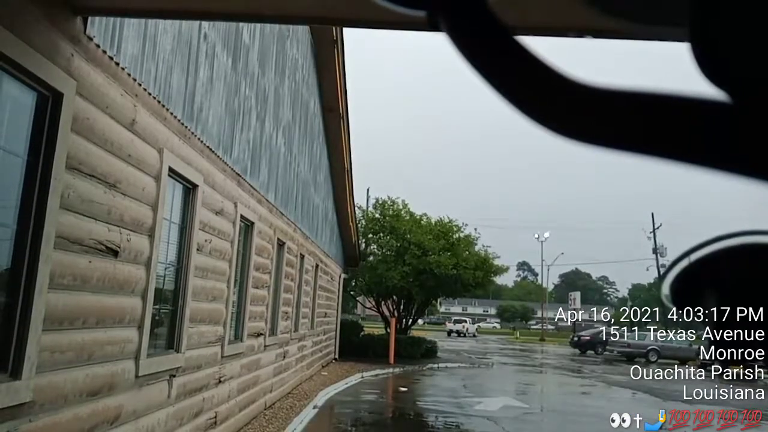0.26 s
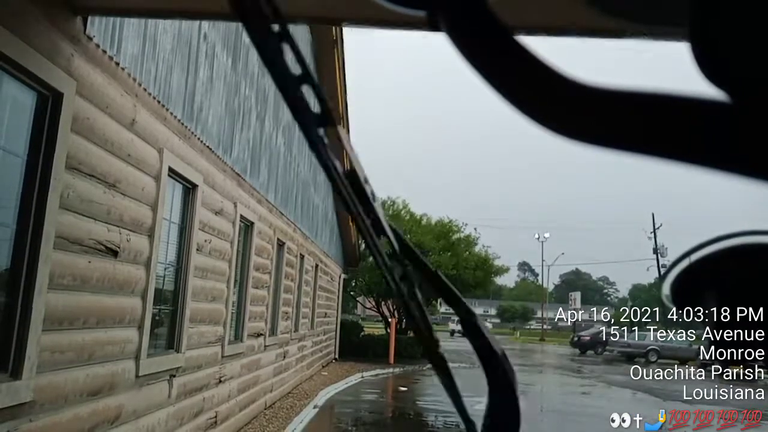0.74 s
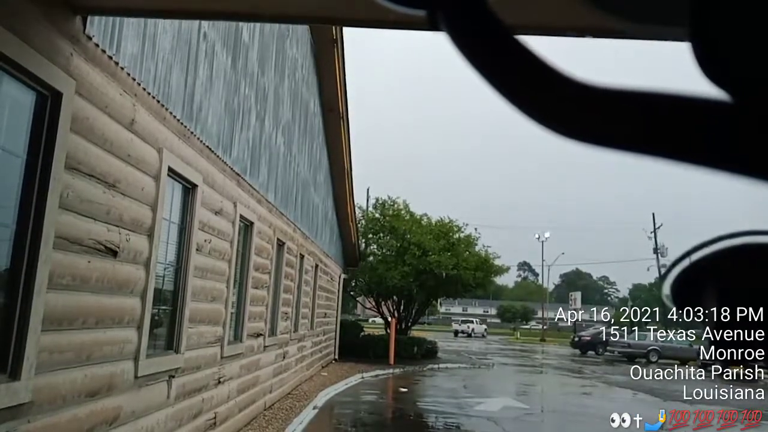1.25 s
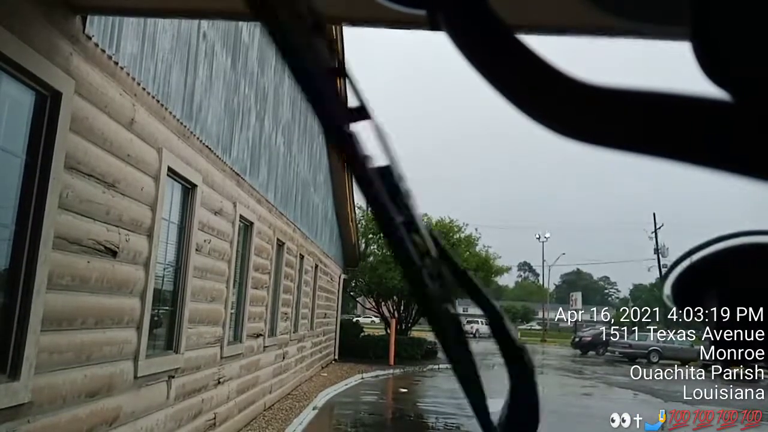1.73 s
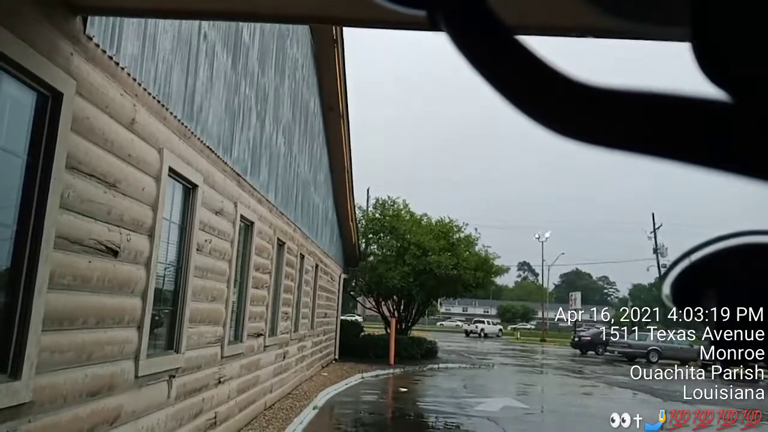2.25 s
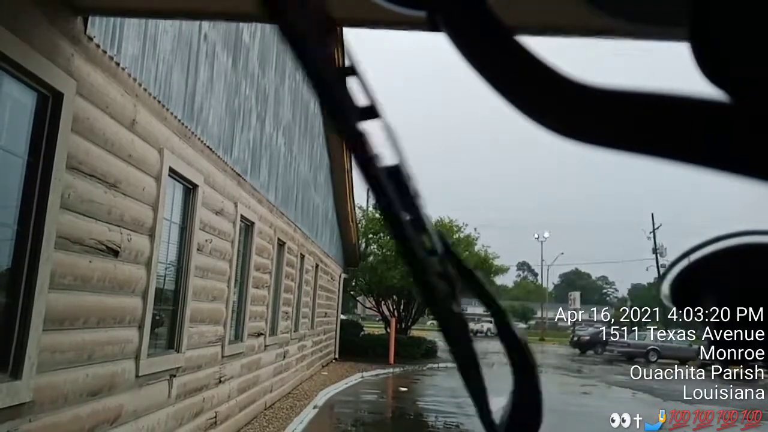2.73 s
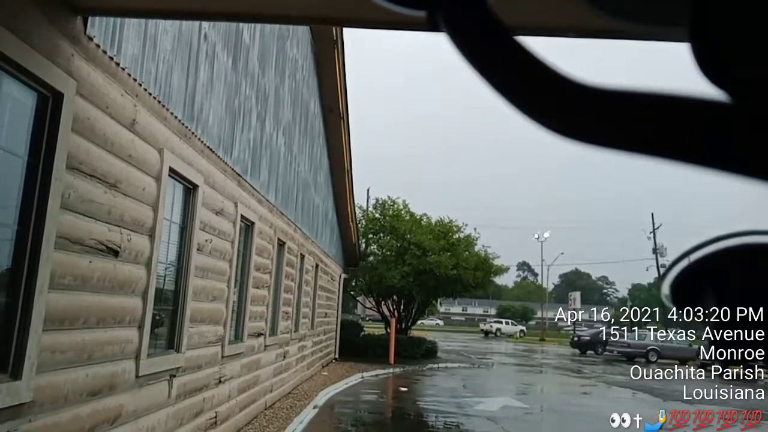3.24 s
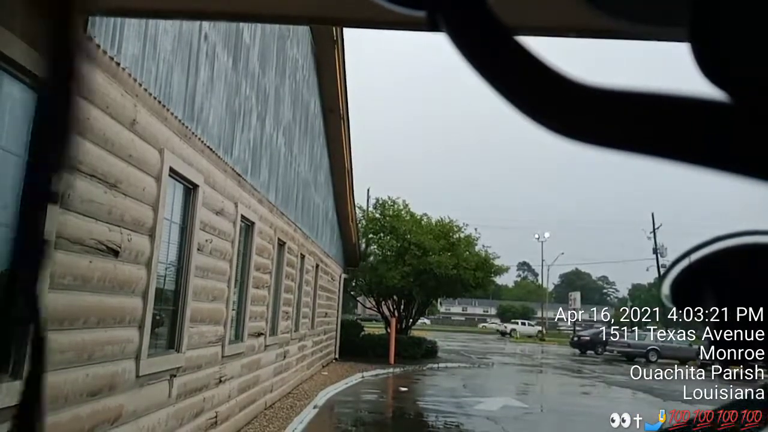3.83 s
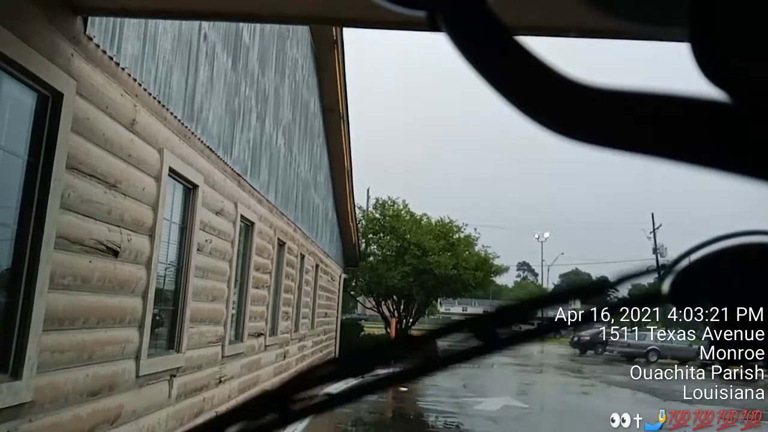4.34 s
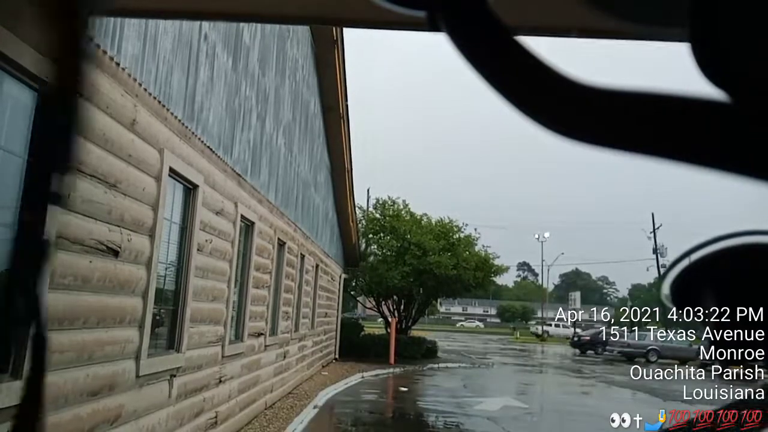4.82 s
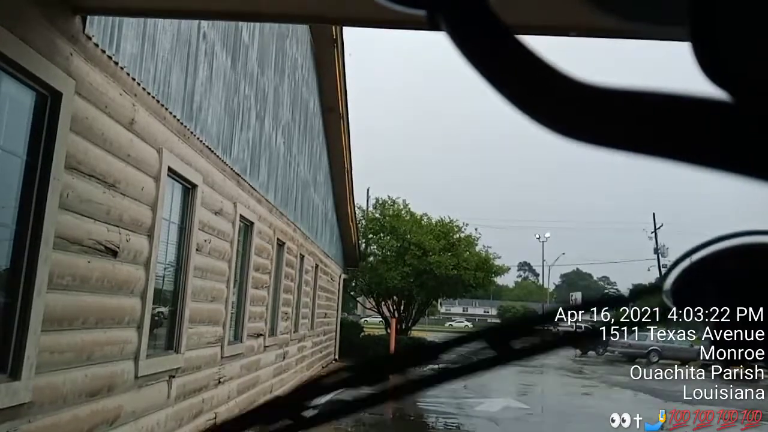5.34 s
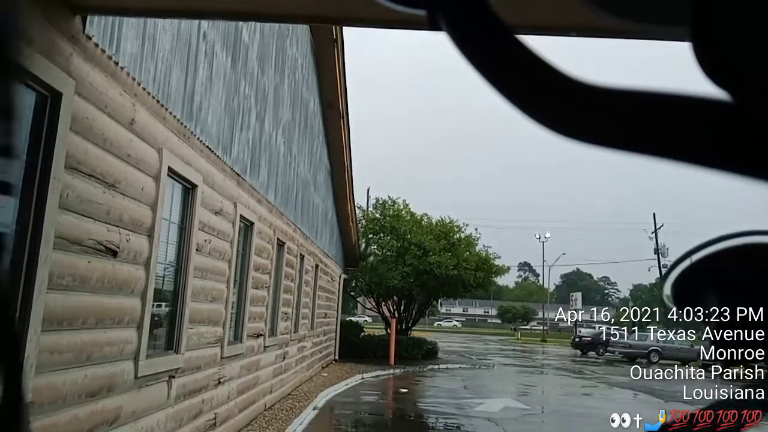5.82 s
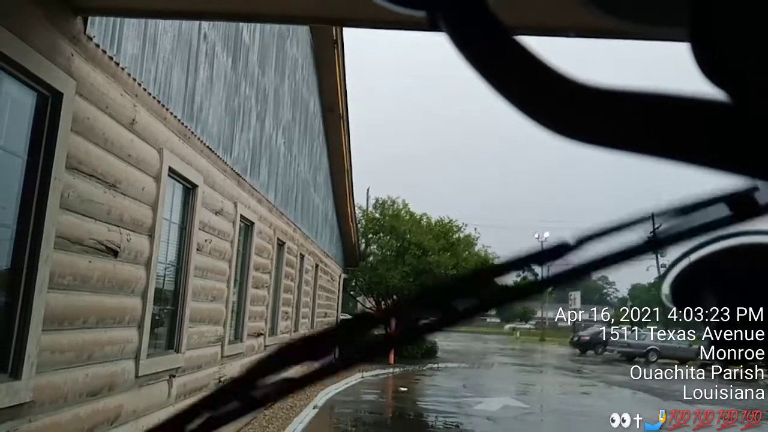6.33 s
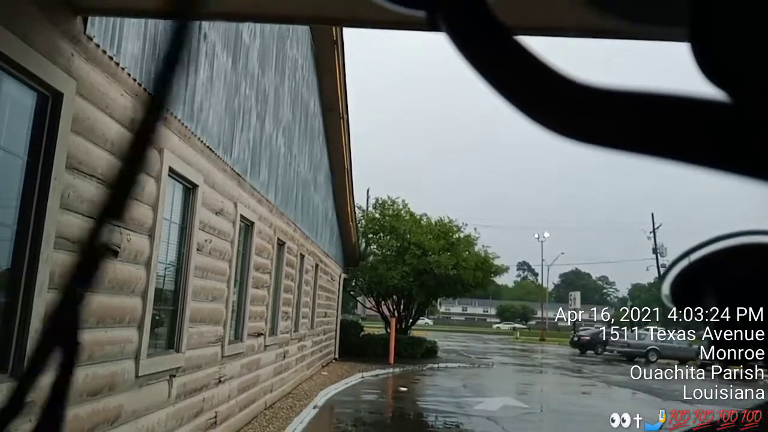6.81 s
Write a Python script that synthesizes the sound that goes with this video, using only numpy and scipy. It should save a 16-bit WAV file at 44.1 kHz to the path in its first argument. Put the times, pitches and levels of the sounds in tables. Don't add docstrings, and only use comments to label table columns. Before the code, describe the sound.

Rubber wiper blades squeal, chirp and thump rhythmically across damp glass, with faint water swishes and a low engine rumble in the cabin.

```python
import sys
import numpy as np
from scipy import signal
from scipy.io import wavfile
from scipy.ndimage import uniform_filter1d

SR = 44100
rng = np.random.default_rng(int(sys.argv[2]) if len(sys.argv) > 2 else 0)


def dump(signal):
    limited = np.clip(np.atleast_2d(signal).T, -1, 1)
    pcm = np.round(limited * 32767).astype(np.int16)
    wavfile.write(sys.argv[1], SR, pcm)


N = 311787

# start t/s, slowing t/s, squeal level/dB, slip rate f/Hz, last chirp level/dB
STROKES = [
    (0.398, 0.696, -23, 2073, -20.5),
    (1.361, 1.665, -23.5, 2091, -29),
    (2.334, 2.637, -22.5, 2100, -22),
    (3.311, 3.62, -23, 2100, -25.5),
    (4.289, 4.592, -23, 2073, -31),
    (5.272, 5.579, -23.5, 2098, -25),
    (6.271, 6.57, -24.5, 2100, -31.5),
]
# dip t/s, lowest f/Hz, fall time/s, rise time/s, level/dB
SLOW_DIPS = [
    (0.56, 1240, 0.1, 0.066, -40.5),
    (1.537, 1297, 0.078, 0.032, -35),
    (2.501, 1205, 0.049, 0.057, -38),
    (3.488, 1216, 0.081, 0.041, -38.5),
    (4.453, 1208, 0.075, 0.072, -36.5),
    (5.445, 1268, 0.055, 0.046, -35.5),
    (6.434, 1250, 0.034, 0.038, -37),
]


def squeal():
    # t/s, change/dB, recovery time/s
    catches = [(0.401, -2.5, 0.13), (1.365, 0.5, .06), (2.564, -9, 0.012), (3.31, -1.5, .06),
               (4.339, -9, 0.014), (4.386, -4.5, 0.039), (5.27, -7, 0.017), (5.514, -8.5, 0.017),
               (6.27, -8, 0.022), (6.385, -5, 0.042), (6.423, 9.5, 0.033), (6.556, 0.5, .03)]
    # f/Hz, level/dB per Hz
    spray_spectrum = [(2000, -26.5), (3400, -7.5), (4120, -11), (6530, -18.5), (7150, -13), (7800, -48),
                      (10100, -79), (17200, -120)]
    t = np.arange(N) / SR
    plan = stroke_plan()
    level_db, slip_hz, octave_db, spray_db = in_time(plan)
    for s, change_db, recovery_s in catches:
        level_db = level_db + change_db * (t > s) * np.exp(-np.abs(t - s) / recovery_s)
    fan = 0.81 + 0.5 * sum(np.exp(-((t - dip) / 0.11) ** 2) for dip, *rest in SLOW_DIPS)
    narrow = np.clip(narrowing(t), 0, 0.9)
    bend = 0.029 * drift(20)
    base, octave, third = 0, 0, 0
    for offset in (-0.29, -0.16, -0.065, -0.03, 0.03, 0.1, 0.18, 0.25):
        spread = offset * (1 - narrow) * (fan if offset > 0 else 0.85)
        jitter = 0.025 * drift(22) + 0.014 * drift(600)
        phase = 2 * np.pi * np.cumsum(slip_hz * (1 + spread + bend + jitter)) / SR
        grip = from_db(5.57 * drift(41))
        outer_loss = from_db(-45 * abs(offset) * (fan - 0.03 if offset < 0 else 1))
        base = base + grip * outer_loss * np.sin(phase)
        sharp = grip * from_db(-60 / fan * abs(offset + 0.095))
        octave = octave + sharp * np.sin(2 * phase)
        third = third + sharp * np.sin(3 * phase)
    above = signal.butter(4, 3300, "high", fs=SR, output="sos")
    hiss = signal.sosfilt(above, coloured(spray_spectrum, patchy_db=0.4, rate=16))
    hiss = hiss * from_db(-13 * narrow)
    spray = 0.82 * evened(third, size=900) + 1.98 * hiss
    rough_octave = evened(octave * (1 + 0.23 * drift(300)), size=1500)
    upper = from_db(octave_db - 2.0) * rough_octave + from_db(spray_db) * spray
    return gate(plan, 0.0025) * (from_db(level_db) * evened(base, size=900) + upper)


def stroke_plan():
    octave_levels = (-28.5, -25, -7, -3, -5.5, -12)
    spray_levels = (-18, -7.5, -12, -12.5, -16.5, -27)
    # t/s, length/s, level/dB, f/Hz
    skid = [
        (5.0135, 0.078, -27.5, 2007),
    ]
    bite_s, octave_bite_s = 0.017, 0.02
    crest_share, fade_share = 0.72, 0.92
    speed_up = 0.06
    chirp_peak_s, chirp_end_s, chirp_hz, chirp_sag = 0.036, 0.066, 2100, 0.07
    chirp_in_db, chirp_out_db, chirp_octave_db, chirp_spray_db = -29.5, -65, -28, -45.5
    plan = []
    for start, slowing, db, hz, chirp_db in STROKES:
        length = slowing - start
        s = start + np.array([0, bite_s, octave_bite_s, crest_share * length, fade_share * length, length])
        level = np.array([-8, -1.5, -1, 0, 1.9, -3])
        rate = hz * (1 + speed_up * np.clip((s - start) / (fade_share * length), 0, 1))
        stroke = [s, db + level, rate, db + np.array(octave_levels), db + np.array(spray_levels)]
        plan.append(np.transpose(stroke))
        low = chirp_hz * (1 - chirp_sag)
        plan.append(np.array([
            (slowing + 1e-4, chirp_in_db, chirp_hz, chirp_octave_db - 1.5, chirp_spray_db),
            (slowing + chirp_peak_s, chirp_db, low, chirp_octave_db, chirp_spray_db + 2.5),
            (slowing + chirp_end_s, chirp_out_db, low * (1 - chirp_sag), chirp_out_db - 6.5, chirp_out_db - 11)]))
    (s, length, db, hz), = skid
    plan.append(np.array([(s, db - 14, hz, db - 18, db - 26),
                          (s + 0.016, db, hz, db - 6.5, db - 21.5),
                          (s + length, db - 16, hz, db - 45, db - 27)]))
    return sorted(plan, key=lambda rows: rows[0, 0])


def narrowing(t):
    total = 0
    for start, slowing, *rest in STROKES:
        total = total + 0.25 * np.exp(-((t - start) / 0.06) ** 2)
        total = total + 0.35 * np.clip((t - slowing) / 0.02, 0, 1) * (t < slowing + 0.2)
    return total


def slow_end():
    t, hz, level = np.arange(N) / SR, 1600.0, 0
    for dip, low_hz, fall, rise, db in SLOW_DIPS:
        away = np.abs(t - dip) / np.where(t < dip, fall, rise)
        hz = hz - (1600 - low_hz) * np.clip(1 - 0.72 * away, 0, 1)
        level = level + from_db(db) * np.exp(-away ** 6)
    strands = 0
    for ratio, db in ((1.0, -1.5), (0.74, -22), (1.16, -5)):
        waver = 0.015 * drift(40) + 0.014 * drift(500)
        strands = strands + from_db(db + 4.5 * drift(50)) * tone(hz * (ratio + waver), -10)
    return level * strands


def reversals():
    # t/s, peak level/dB, strongest mode f/Hz, boom re glass/dB, contact time/s
    landings = [
        (0.159, -17.5, 250, -1, 0.09),
        (1.155, -18, 274, 1.5, 0.064),
        (2.125, -16.5, 272, -26, 0.054),
        (3.104, -17.5, 250, -23, 0.06),
        (4.078, -16, 283, -3, 0.058),
        (5.049, -17.5, 288, -14, 0.08),
        (6.039, -18, 257, -28, 0.069),
        (7.048, -21, 266, -27, 0.031),
    ]
    flips = [
        (0.282, -18, 463, 3, 0.021),
        (1.250, -15.5, 296, -6, 0.023),
        (2.225, -14, 425, -3, 0.01),
        (3.197, -14.5, 386, -5.5, 0.019),
        (4.172, -12.5, 272, -4.5, 0.015),
        (5.153, -12.5, 325, -11.5, 0.02),
        (6.142, -12, 321, -11, 0.016),
    ]
    bumps = [
        (0.234, -17, 220, -9, 0.015),
    ]
    top_thuds = [
        (0.780, -12, 330, -0.5, 0.025),
        (1.752, -9.5, 312, -3.5, 0.03),
        (2.724, -8.5, 335, -3.5, 0.031),
        (3.703, -6, 331.6, -7.5, 0.067),
        (4.676, -9, 311, -5.5, 0.05),
        (5.671, -11, 346.5, -2.5, 0.027),
        (6.657, -8.5, 312, -3.5, 0.022),
    ]
    rebounds = [
        (3.758, -12, 194, -1, 0.052),
        (6.688, -21, 199, -5, 0.0077),
    ]
    let_go = (4.4, 1.95, 2.3, 3.0, 2.94)
    # f/Hz, level/dB, t60/s
    cabin_modes = [(87, -21.5, 0.052), (100.9, 1.5, 0.25), (141.3, 8.5, 0.11), (151.4, -2, 0.42),
                   (186, 9, 0.14)]
    glass_modes = [(250, -6, 0.086), (299.3, -1, 0.14), (337.3, -1, 0.082), (441.4, -1, 0.057),
                   (508, -3, 0.033), (621.5, -6, 0.068), (730, -9, 0.022), (962, -23, 0.092)]
    # f/Hz, level/dB per Hz
    rasp_spectrum = [(410, -24.5), (700, -8), (1010, -10), (1400, -4.5), (5940, -21), (6700, -13),
                     (7800, -57.5), (10100, -68.5), (17200, -120)]
    boom_lag_s, early_boom_s, early_boom_db = 0.006, 0.024, -10.5
    lead = 0.03
    kinds = (landings, -36.5), (flips, -31.5), (bumps, -57), (top_thuds, -33), (rebounds, -33.5)
    knocks = [(*row, db, sharp) for (rows, db), sharp in zip(kinds, let_go) for row in rows]
    out = np.zeros(N + SR)
    rasp = np.append(coloured(rasp_spectrum, patchy_db=3.0, rate=120), np.zeros(SR))
    dull = signal.lfilter(*signal.butter(1, 4300, fs=SR), rasp)
    bright = rasp - dull
    t = np.arange(SR // 2) / SR - lead
    for s, peak_db, main_hz, boom_db, contact, rasp_db, sharp in knocks:
        onset = np.sin(np.clip(t / (0.0024 + 0.32 * contact), 0, 1) * np.pi / 2) ** 2
        push = onset * np.exp(-np.abs(t / (contact + 0.0083)) ** sharp)
        shake = rng.standard_normal(len(t)) * push
        late = np.roll(shake, round(boom_lag_s * SR))
        late = late + from_db(early_boom_db) * np.roll(shake, -round(early_boom_s * SR))
        boom = struck(late, cabin_modes)
        glass = struck(shake, glass_modes) + 1.3 * ring(shake, main_hz, 0.051)
        body = glass / np.abs(glass).max() + from_db(boom_db) * boom / np.abs(boom).max()
        i = round((s - 0.011 - lead) * SR)
        here = slice(i, i + len(t))
        scrape = push ** 1.12 * dull[here] + push ** 1.2 * bright[here]
        out[here] += from_db(peak_db) * body + from_db(rasp_db) * scrape
    return out[:N]


def arm_hum():
    # start t/s, crest t/s, crest level/dB, after-hum level/dB, end t/s
    returns = [
        (-0.2, -0.012, -34, -40.5, 0.048),
        (0.814, 0.931, -26, -28, 1.09),
        (1.822, 1.933, -26.5, -41.5, 2.18),
        (2.794, 2.928, -26.5, -38.5, 3.02),
        (3.82, 3.841, -24, -35, 4.02),
        (4.73, 4.82, -27.5, -28.5, 4.91),
        (5.826, 5.881, -28, -40, 6.05),
        (6.745, 6.88, -32.5, -40, 7.04),
    ]
    hum_hz, sag, drop_s, again_s = 344, 0.0255, 0.012, 0.02
    plan = []
    for s, crest, db, after_db, end in returns:
        plan.append([(s, hum_hz, -46),
                     (s + 0.45 * (crest - s), hum_hz, db - 3.5),
                     (crest, hum_hz * (1 - sag), db),
                     (crest + drop_s, hum_hz, -43),
                     (crest + drop_s + again_s, hum_hz, after_db),
                     (end, hum_hz, -52.5)])
    hz, db = in_time(plan)
    voice = tone(hz * (1 + 0.021 * drift(30)), -25.0, -30.0)
    return gate(plan, 0.027) * from_db(db + 1.2 * drift(22)) * voice


def rubber_note():
    # t/s, f/Hz, level/dB, length/s
    sung = [
        (3.242, 604, -41, 0.16),
    ]
    (s, hz, db, length), = sung
    shape = [(s, db - 22), (s + 0.026, db), (s + length, db - 75 * length)]
    level_db = in_time(shape)[0] + 1.7 * drift(30)
    return gate([shape], 0.02) * from_db(level_db) * tone(hz * (1 + 0.0076 * drift(30)), -21)


def splashes():
    # t/s, peak level/dB, centre f/Hz, length/s
    flicks = [(0.1, -51, 2100, 0.02), (0.203, -30, 1190, 0.019), (0.93, -30.5, 2100, 0.022),
              (0.97, -35.5, 1870, 0.032), (1.097, -36, 6340, 0.019), (2.0143, -36.5, 2300, 0.034),
              (2.0885, -26.5, 5800, 0.045), (2.852, -28, 2110, 0.047), (2.9227, -25.5, 2384, 0.052),
              (2.953, -36, 1940, 0.026), (3.082, -30, 1920, 0.011), (3.7548, -48, 995, 0.015),
              (3.781, -19, 1350, 0.011), (4.971, -30, 2260, 0.038), (5.001, -23.5, 2110, 0.045),
              (5.214, -33, 4950, 0.054), (5.822, -45.5, 6567, 0.02), (6.0164, -35, 1395, 0.0184)]
    out, t = np.zeros(N + SR), np.arange(SR // 8) / SR
    above = signal.butter(2, 1300, "high", fs=SR, output="sos")
    for s, peak_db, hz, length in flicks:
        white = rng.standard_normal(len(t))
        puff = signal.sosfilt(above, 0.45 * rms_one(ring(white, hz, 3.1 / hz)) + 1.12 * white)
        shape = np.clip(t / 0.004, 0, 1) * np.exp(-(t / length) ** 2)
        i = round(s * SR)
        out[i:i + len(t)] += from_db(peak_db - 8.5) * puff * shape
    return out[:N]


def engine_idle():
    # t/s, level/dB
    load = [
        (0.0, -75),
        (1.52, -47),
        (1.79, -53.5),
        (3.82, -50),
        (4.31, -43.5),
        (4.84, -55.5),
        (5.08, -42.5),
        (5.42, -53.5),
        (6.87, -43.5),
        (7.07, -41),
    ]
    third_db, = in_time(load)
    speed = 62.2 * (1 + 0.028 * drift(1.54))
    third = from_db(third_db + 1.5 + 2.4 * drift(8)) * tone(3 * speed)
    return third + from_db(-46 + 1.0 * drift(21)) * tone(2 * speed)


def cabin(thuds):
    # t/s, rumble level/dB, drone level/dB
    shudders = [(0.0, -48, -40.5), (0.268, -34, -43.5), (0.812, -32.5, -27.5), (1.281, -34.5, -53),
                (1.829, -39, -33.5), (2.202, -34, -39.5), (2.81, -39, -30.5), (3.201, -32.5, -43),
                (3.759, -30.5, -31.5), (4.211, -36, -46.5), (4.712, -35.5, -24.5), (5.14, -32, -47),
                (5.748, -40, -28.5), (6.14, -36, -37), (6.71, -32.5, -28.5)]
    # f/Hz, level/dB per Hz
    rumble_spectrum = [(13, -65.5), (22, -54.5), (49, -4.5), (86, -13), (118, -3.5), (163, -13.5),
                       (300, -19.5), (390, -45), (660, -120)]
    drone_spectrum = [(110, -42.5), (180, -17), (200, -25.5), (216, -20.5), (340, -1.5), (569, -23),
                      (969, -33), (1200, -50.5), (1560, -68.5), (2640, -120)]
    swish_spectrum = [(470, -9.5), (800, -24.5), (1300, -17.5), (1500, -20.5), (1830, -11), (2810, -20.5),
                      (6320, -20), (7800, -13.5), (10100, -53), (17200, -120)]
    s, rumble_db, drone_db = np.transpose(shudders)
    mid_strokes = [start + 0.84 * (slowing - start) for start, slowing, *rest in STROKES]
    load = peaks(mid_strokes, np.zeros(len(STROKES)), rise_db_s=67.5, fall_db_s=67.5)
    rumble = from_db(-52) + from_db(-43.5) * load + peaks(s, rumble_db, rise_db_s=86.5, fall_db_s=82)
    drone = from_db(-54) + from_db(-48.5) * load + peaks(s, drone_db, rise_db_s=154.5, fall_db_s=120)
    swish = from_db(-54) + from_db(-44.5) * load
    rumble = rumble * evened(coloured(rumble_spectrum, patchy_db=0.5, rate=6.3), size=8000)
    drone = drone * coloured(drone_spectrum, patchy_db=3.0, rate=11.0)
    swish = swish * coloured(swish_spectrum, patchy_db=2.0, rate=14)
    return rumble + drone + swish * ducking(thuds, depth_db=6.0, release_db_s=250)


def ducking(loud, depth_db, release_db_s):
    level = np.clip(20 * np.log10(np.abs(loud) + 1e-9) + 30, 0, 20)
    ramp = release_db_s * np.arange(N) / SR
    held = np.maximum.accumulate(level + ramp) - ramp
    return from_db(-depth_db * uniform_filter1d(held, size=400) / 20)


def from_db(db):
    return np.exp(np.asarray(db) * (np.log(10) / 20))


def rms_one(x):
    return x / np.sqrt(np.mean(x ** 2) + 1e-20)


def evened(x, size):
    return x / np.sqrt(uniform_filter1d(x ** 2, size) + 1e-12)


def in_time(rows):
    rows = np.concatenate(rows) if np.ndim(rows[0]) > 1 else np.array(rows)
    return [np.interp(np.arange(N) / SR, rows[:, 0], column) for column in rows.T[1:]]


def gate(spans, fade_s):
    t = np.arange(N) / SR
    return sum(np.clip(np.minimum(t - s[0][0], s[-1][0] - t) / fade_s + 0.5, 0, 1) for s in spans)


def peaks(times, tops_db, rise_db_s, fall_db_s):
    t = np.arange(0, N + 64, 64) / SR
    gain = 0
    for s, db in zip(times, tops_db):
        gain = gain + from_db(db - np.where(t < s, rise_db_s * (s - t), fall_db_s * (t - s)))
    return np.interp(np.arange(N) / SR, t, gain)


def drift(rate):
    r = np.exp(-16 * np.pi * rate / SR)
    slow = signal.lfilter([1], [1, -2 * r, r * r], rng.standard_normal(N // 8 + 4002))[4000:]
    return np.interp(np.arange(N) / 8, np.arange(len(slow)), rms_one(slow))


def ring(x, hz, t60):
    r, w = from_db(-60 / (t60 * SR)), 2 * np.pi * hz / SR
    return signal.lfilter([0, np.sin(w)], [1, -2 * r * np.cos(w), r * r], x + 1e-18)


def struck(x, modes):
    return sum(from_db(db) * ring(x, hz, t60) * (-1) ** k for k, (hz, db, t60) in enumerate(modes))


def coloured(spectrum, patchy_db, rate):
    hz, db = np.transpose(spectrum)
    edges = hz[0] * 2 ** np.arange(0, np.log2(hz[-1] / hz[0]) + 0.3, 1 / 3)
    white, together, out = rng.standard_normal((2, N)), drift(rate), 0
    for k, (low, high) in enumerate(zip(edges, edges[1:])):
        band = signal.sosfilt(signal.butter(2, [low, high], "band", fs=SR, output="sos"), white[k % 2])
        level = np.interp(np.log(low * high) / 2, np.log(hz), db)
        out = out + band * from_db(level + patchy_db * (together + 0.93 * drift(rate)))
    return rms_one(out)


def tone(hz, *overtones_db):
    phase = 2 * np.pi * np.cumsum(hz) / SR
    return np.sqrt(2) * sum(from_db(db) * np.sin((k + 1) * phase) for k, db in enumerate((0, *overtones_db)))


def scene():
    thuds = reversals()
    blade = squeal() + slow_end() + rubber_note()
    mix = blade + thuds + arm_hum() + splashes() + engine_idle() + cabin(thuds)
    return mix[None]


def band_limit(x):
    return signal.sosfilt(signal.butter(12, 7970, fs=SR, output="sos"), x)


def record(dry):
    x = 0.79 * np.tanh(dry / 0.77)
    x = signal.sosfilt(signal.butter(3, 46, "high", fs=SR, output="sos"), x)
    x = signal.sosfilt(signal.butter(6, 7200, fs=SR, output="sos"), x)
    x = signal.sosfilt(signal.cheby2(12, 60, 8000, fs=SR, output="sos"), x)
    return band_limit(x)


dry = scene()
out = record(dry)
dump(out)
```